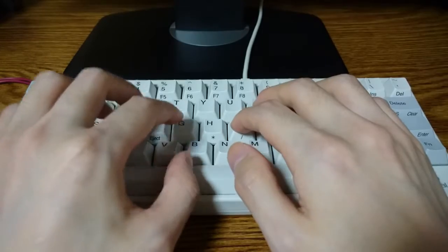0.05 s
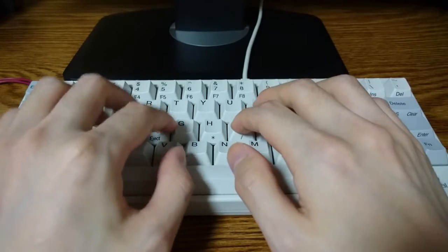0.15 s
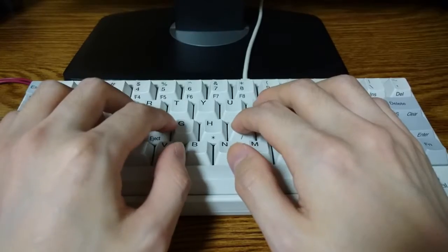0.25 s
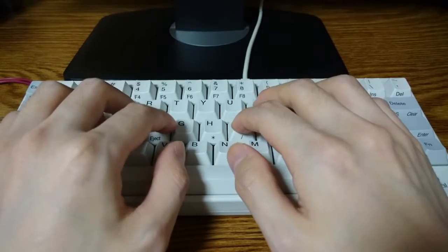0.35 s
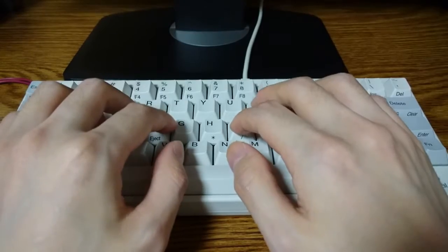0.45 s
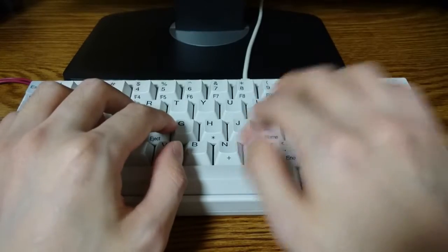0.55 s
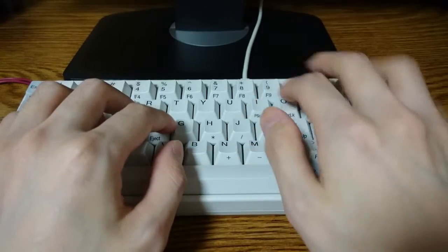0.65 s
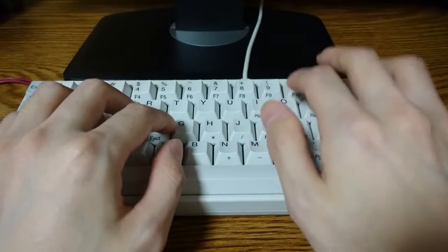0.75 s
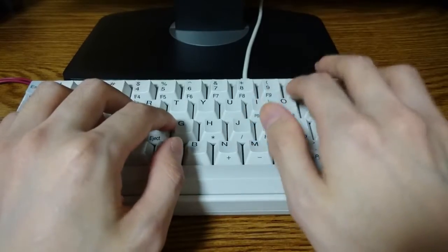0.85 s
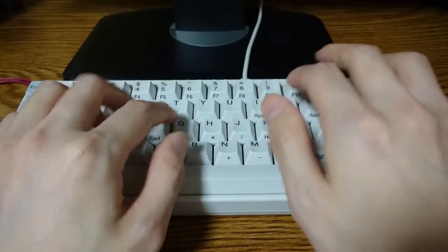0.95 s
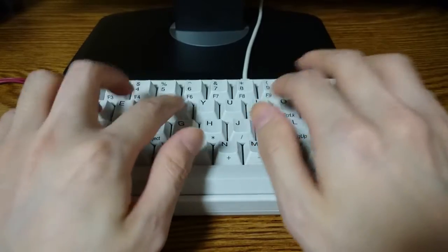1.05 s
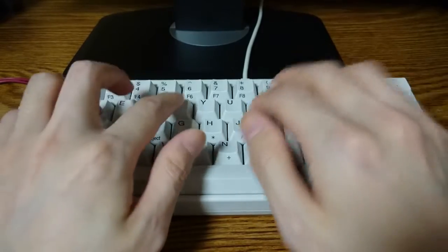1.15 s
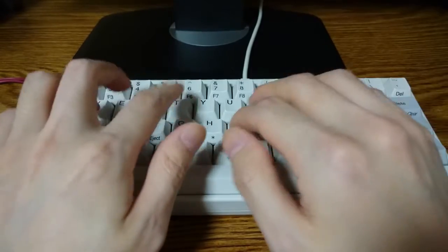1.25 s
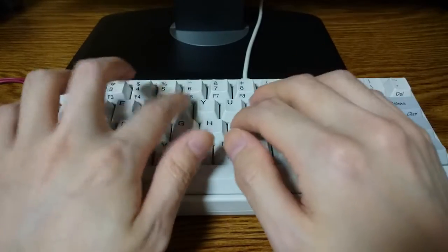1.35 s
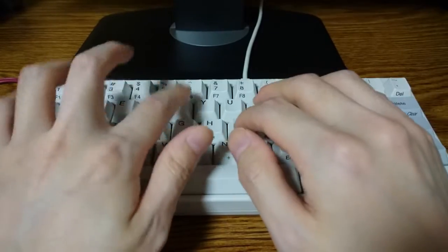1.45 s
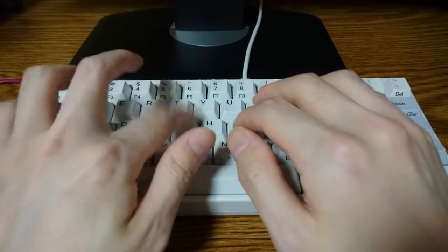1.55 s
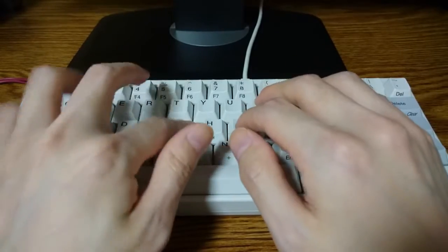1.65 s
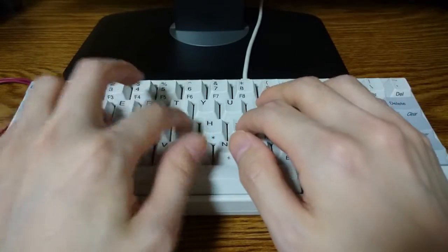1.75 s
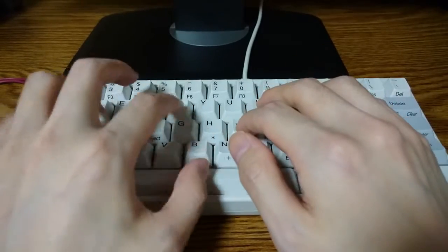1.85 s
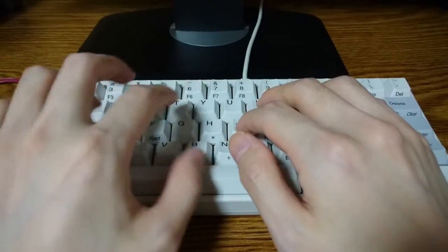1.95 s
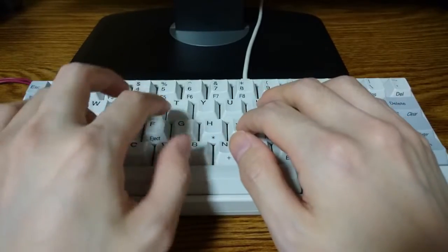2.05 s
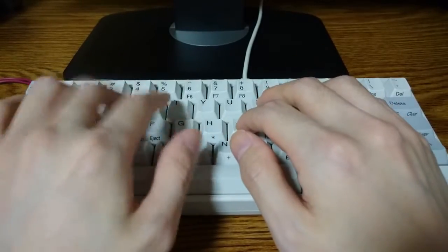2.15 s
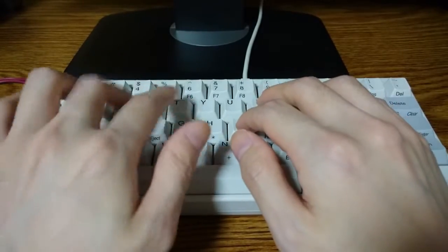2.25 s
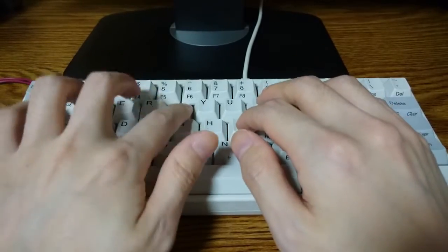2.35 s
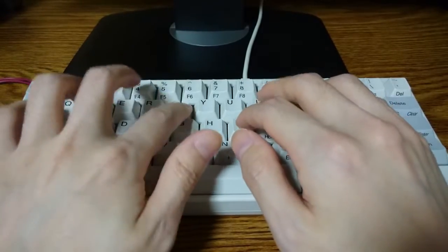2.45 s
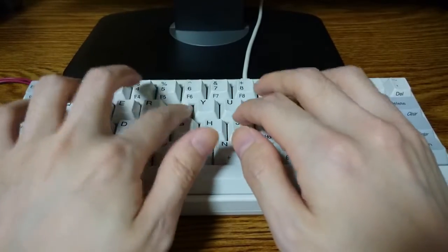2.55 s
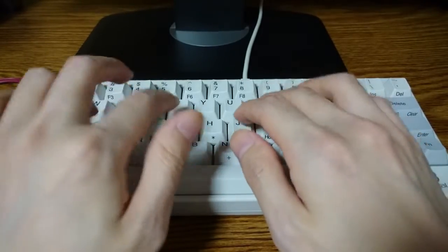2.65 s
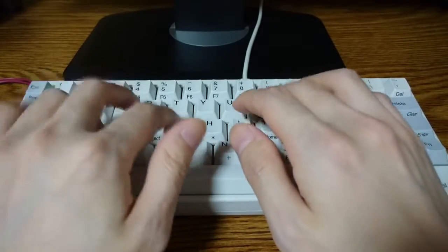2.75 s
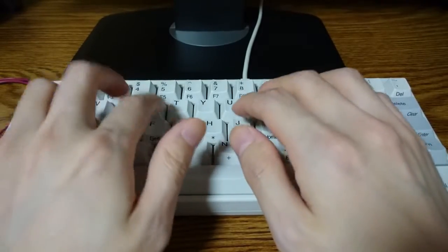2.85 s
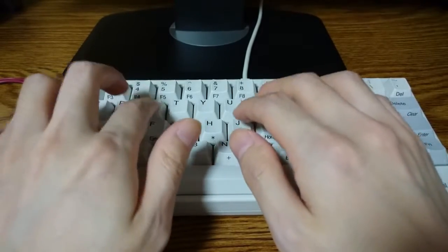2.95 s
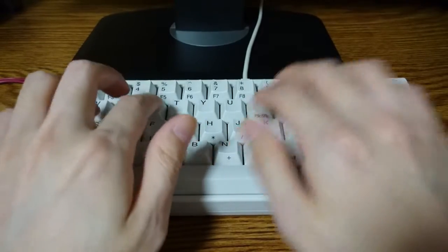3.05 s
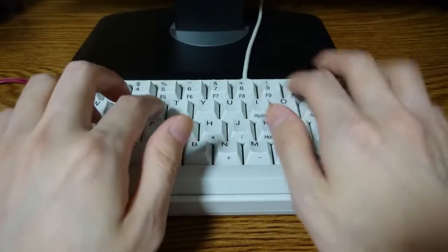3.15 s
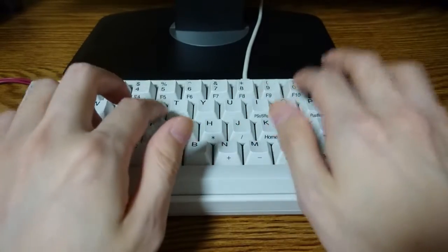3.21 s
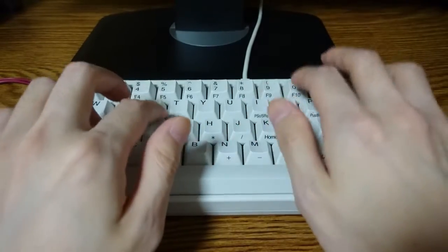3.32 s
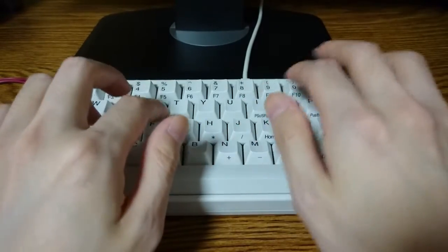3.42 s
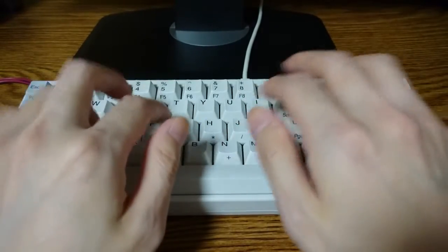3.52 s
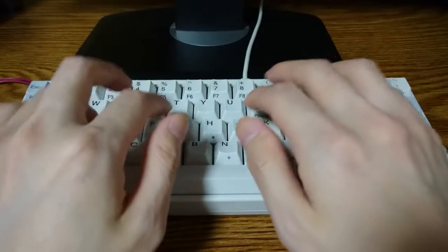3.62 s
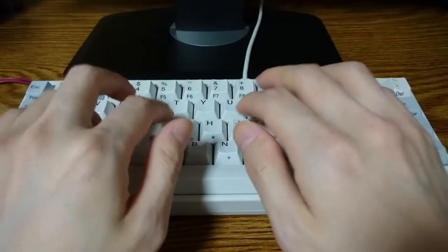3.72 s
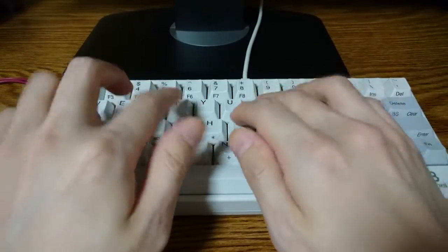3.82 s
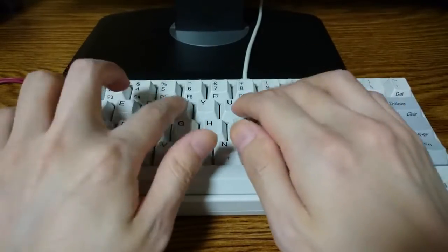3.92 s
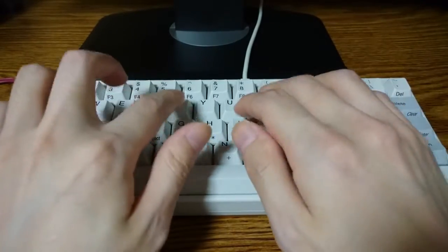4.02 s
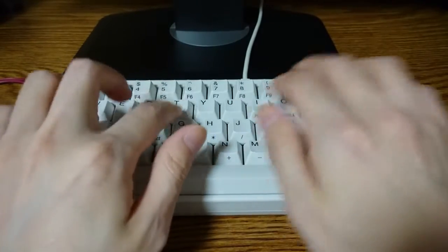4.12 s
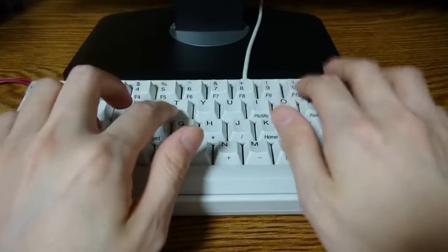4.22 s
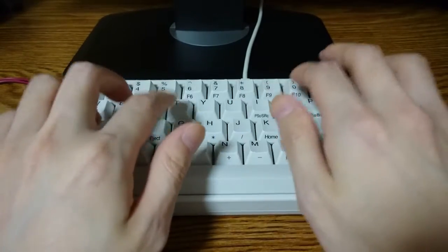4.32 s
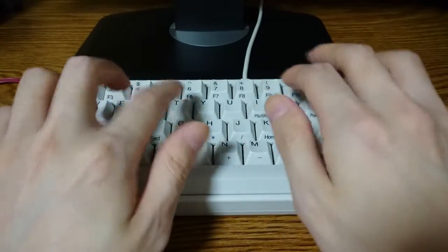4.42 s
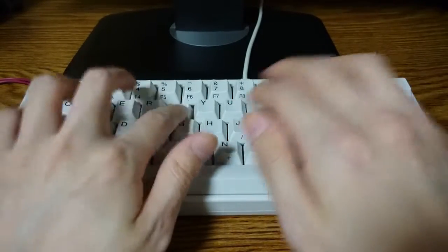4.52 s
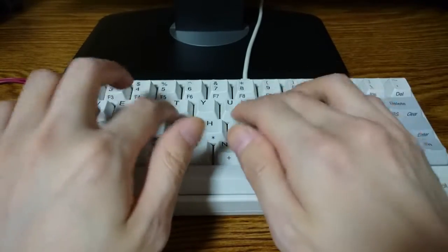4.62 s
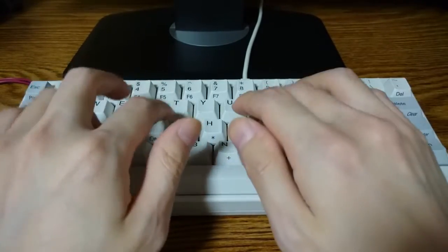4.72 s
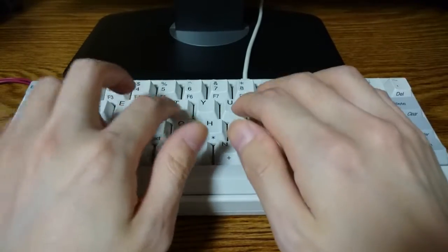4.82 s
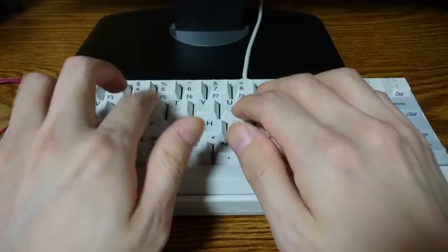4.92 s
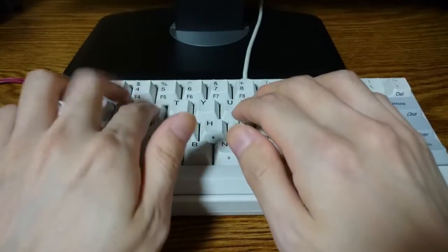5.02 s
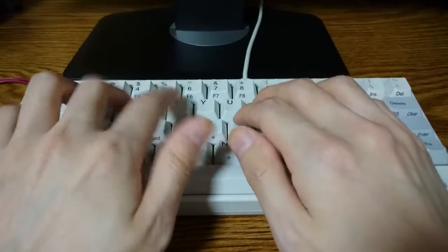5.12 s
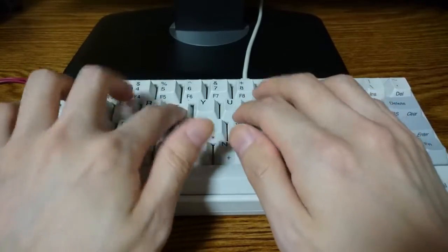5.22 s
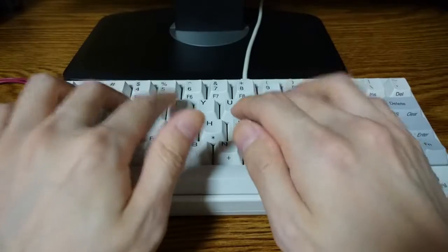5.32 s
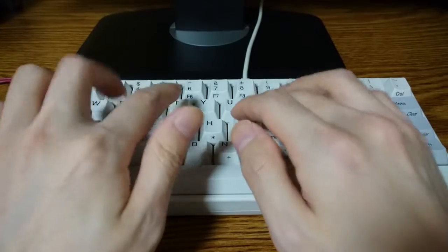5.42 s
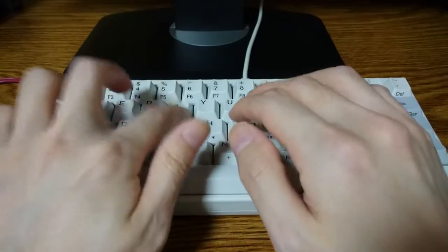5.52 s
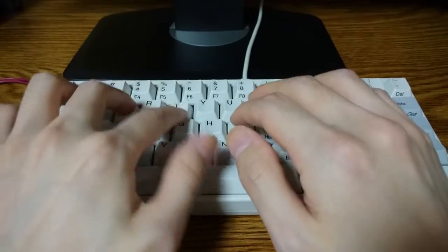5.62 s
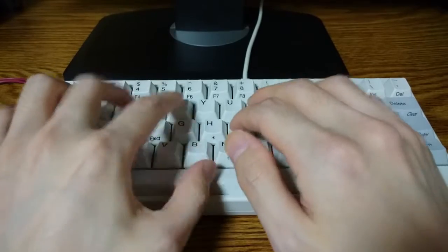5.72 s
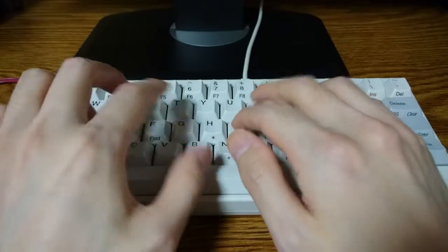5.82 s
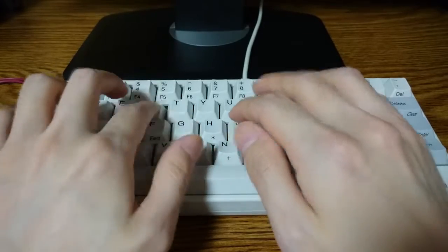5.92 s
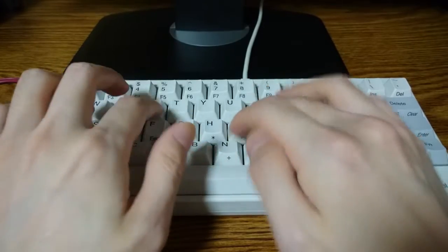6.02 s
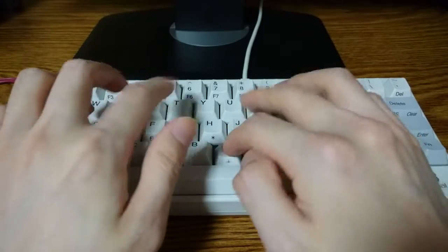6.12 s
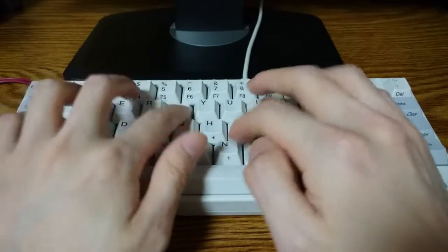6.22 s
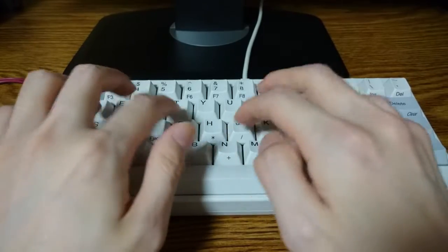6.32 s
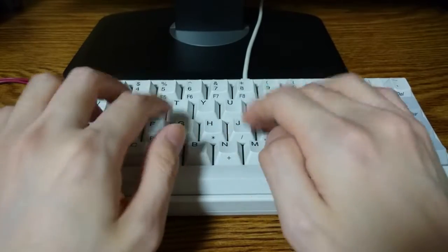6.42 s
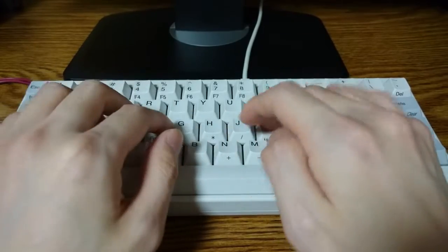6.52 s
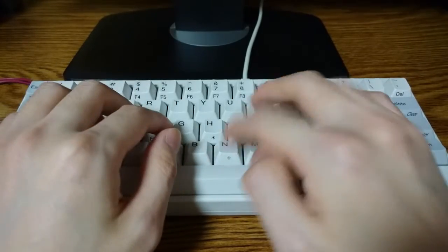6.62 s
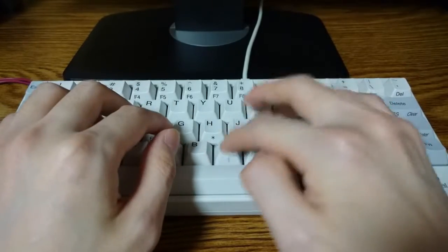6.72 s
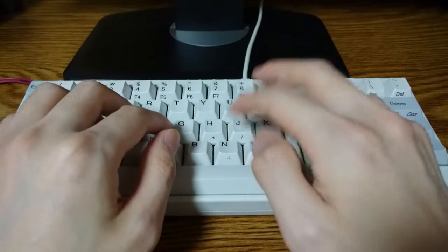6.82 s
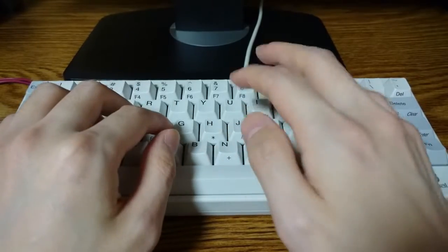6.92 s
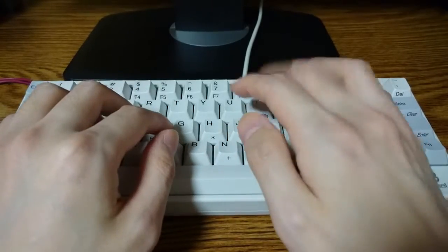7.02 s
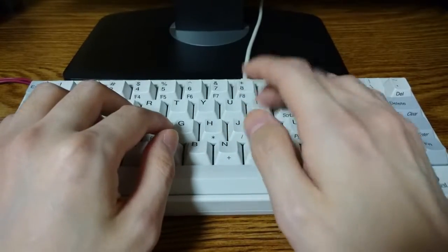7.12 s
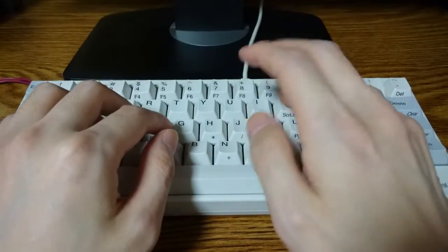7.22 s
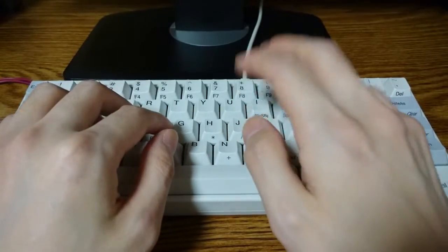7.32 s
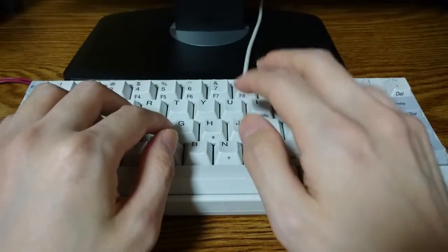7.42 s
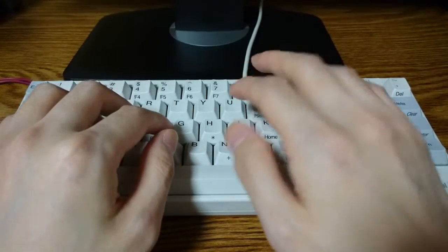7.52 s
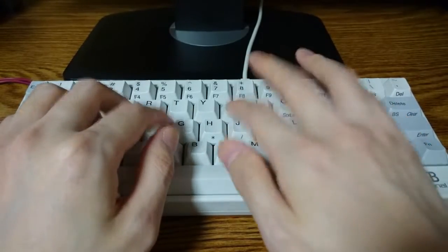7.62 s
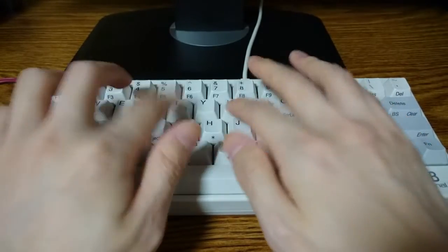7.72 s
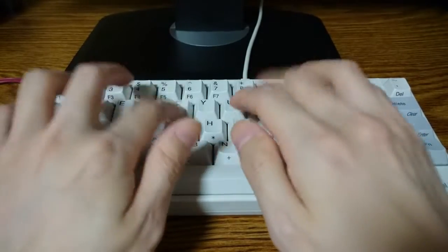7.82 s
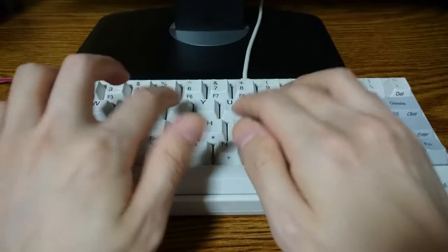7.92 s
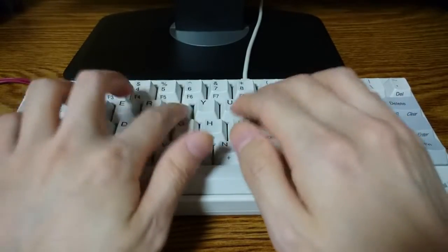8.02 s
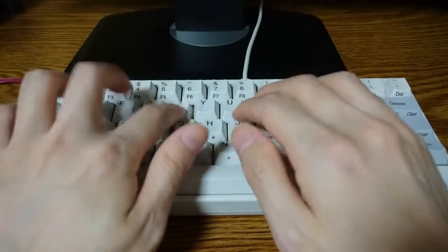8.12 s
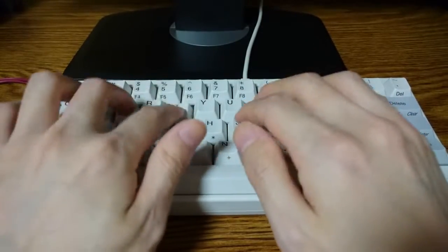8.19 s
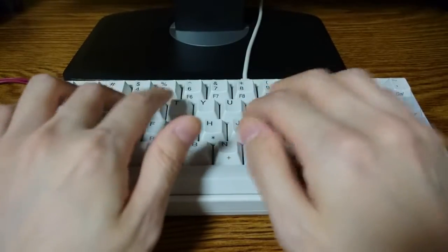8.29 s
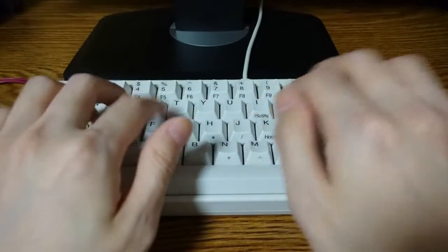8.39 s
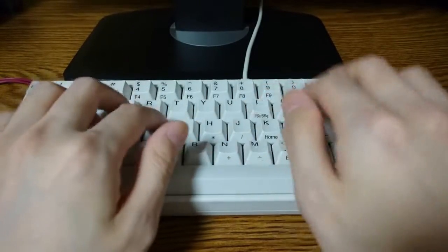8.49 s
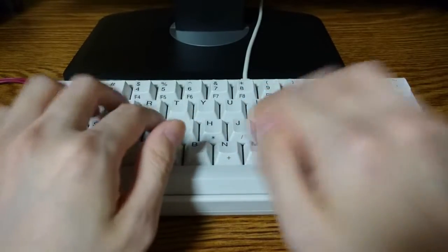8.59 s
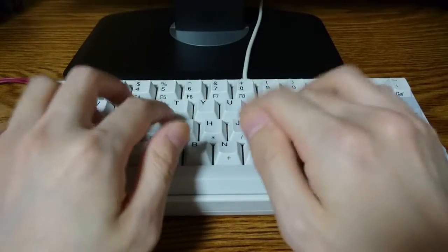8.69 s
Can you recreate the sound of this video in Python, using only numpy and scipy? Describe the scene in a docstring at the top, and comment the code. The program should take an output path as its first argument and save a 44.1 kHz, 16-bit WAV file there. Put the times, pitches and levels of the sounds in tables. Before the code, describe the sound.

A mechanical keyboard on a wooden desk is typed on quickly, heard very close in a quiet room. An opening slap of keys is followed by a short gap, two separate deeper presses, another gap, then nearly continuous typing. Dry plastic clacks mix with soft finger touches and woody thuds, each with a tiny rattle. The stereo image is narrow, with faint steady hiss and little room tail.

```python
"""A faint hiss, then a light touch and a slap open fast typing: dry clacks, soft touches and deeper thuds.
The plastic keyboard stands on a wooden desk in a quiet room, close to a narrow microphone pair.
Each touch, clack or landing is a short chatter of contacts that rings base, plate, cap, stem and wire;
a faint noise swells just before each knock and a rattle follows it. Sparse random taps give the room's
short tail, and coloured noise plus the capsules' own hiss lies underneath."""
import sys
import numpy as np
from scipy import signal
from scipy.fft import rfft, irfft, next_fast_len
from scipy.io import wavfile

SR = 44100
rng = np.random.default_rng(int(sys.argv[2]) if len(sys.argv) > 2 else 0)


def wav_out(sig):
    """Save sig, one row per channel (or a flat mono array), as 16-bit PCM at SR to the path in sys.argv[1]."""
    wavfile.write(sys.argv[1], SR, np.round(np.clip(np.atleast_2d(sig).T, -1, 1) * 32767).astype(np.int16))


N = 385857

# noise colour of the room, only its shape counts: [f/Hz, relative level per Hz/dB]
AIR_COLOUR = [(25, 11), (55, 2), (250, -12), (1000, -16.5), (2100, -18.5), (3500, -24.5), (6000, -35),
              (9000, -66.5)]
# room noise, its side part against it, own hiss of each capsule [level/dB]
AIR_DB, AIR_SIDE_DB, CAPSULE_DB = -61, -13.5, -77

# light touches and bounces that shake little more than cap and stem: [t/s, cap level/dB, stem level/dB]
TOUCHES = [(0.019, -55, -62), (0.0553, -43, -70), (0.0895, -66, -73), (0.095, -47, -65), (0.1095, -48, -51),
           (0.265, -59.5, -69), (0.285, -66, -69), (0.75, -67, -48), (0.8945, -63, -58), (1.041, -57, -73),
           (1.98, -45, -70), (2.001, -49, -59), (2.0278, -50, -61), (2.5638, -60.5, -76),
           (2.6786, -54, -89), (2.7215, -49, -49.5), (2.867, -53, -62), (3.065, -47, -60),
           (3.093, -50.5, -77), (3.724, -59, -69.5), (4.413, -61, -59.5), (4.6225, -45.5, -65),
           (4.738, -61, -63), (4.7812, -46, -64), (5.023, -56.5, -64), (5.1353, -53, -52),
           (5.1502, -54, -49), (5.1623, -65, -50.5), (5.174, -52.5, -55), (5.267, -39.5, -60),
           (5.342, -46.5, -45), (5.4272, -39.5, -56), (5.6158, -44.5, -49), (6.0908, -46, -59),
           (6.1222, -47, -58), (6.157, -82, -47.5), (6.237, -55, -71), (6.3352, -42.5, -58),
           (6.375, -39, -63), (6.4829, -47.5, -55), (6.5003, -50, -51), (6.5177, -47.5, -45.5),
           (6.588, -60, -57), (6.61, -53, -60), (6.78, -52, -47.5), (6.823, -47, -59), (6.936, -71, -65),
           (6.9457, -54, -55), (7.1446, -49.5, -59), (7.2105, -51, -62), (7.4167, -54.5, -71),
           (7.515, -54, -68), (7.5243, -50.5, -56), (7.7125, -49, -70), (7.91, -56, -63), (8.082, -42, -51),
           (8.134, -48, -59), (8.169, -42.5, -73), (8.332, -52, -55)]
# the rest of a touch: [base, plate, wire level against the louder of cap and stem/dB,
# best-ringing cap pitch f/Hz, chatter t/ms]
TOUCH_REST = (-13, -14, -40, 2999.5, 4)
# a key is slapped or snaps back up: [t/s, cap level/dB, stem level against the cap/dB,
# base level against the cap/dB, best-ringing cap pitch f/Hz, chatter t/ms]
CLACKS = [(0.0376, -47.5, -5, -5, 3200, 2), (0.0628, -29, -5, -4, 3070, 3.8),
          (0.153, -44, -19, -5, 2950, 4.1), (0.84, -50, 0, 2.5, 3600.0, 12),
          (0.9971, -49.5, -1.5, 2, 3630, 8.5), (1.6686, -46.0, -4, -18, 2620, 1.4),
          (1.7717, -36, -1.5, -11, 2640, 1.2), (1.8389, -32, -7, -20.0, 2720, 3.5),
          (1.9102, -35, -17, -10, 3000, 11), (1.9313, -29, -7, -6, 3030, 3.8),
          (1.963, -37.5, -6, -5, 2240.0, 2.0), (2.0415, -43.5, -9, -4, 2940, 4.5),
          (2.1033, -41, 3.5, -28, 3360.0, 2.8), (2.2315, -39, 3.5, -8.5, 3240, 1.9),
          (2.42, -38.5, -10, -22, 2870, 2.8), (2.4402, -36, -7.5, -12.0, 2970, 1.6),
          (2.742, -49.0, -8, -4, 3070, 3.2), (2.8163, -41.5, -0.5, -11, 3200, 2.3),
          (2.8826, -32.5, 2, -16, 3160, 0.66), (2.943, -36.5, -5.5, -8, 3200, 1.5),
          (3.074, -36.5, -8.5, -23.0, 2100.0, 2.4), (3.3376, -42.5, 3, -8, 3620, 2.1),
          (3.493, -45, -8, -9, 3600.0, 5.4), (3.6139, -47.5, 2, -8, 2500, 1.8),
          (3.8858, -38.0, -1, -2, 2410, 3.3), (3.989, -46, -11, -14.5, 2630, 4.1),
          (4.2761, -57, 11, 6, 3430.0, 2.3), (4.3064, -38, -10, -5.5, 2400, 14),
          (4.368, -44.5, -0.5, -3, 3570, 4.1), (4.5643, -33, -7.5, -12, 2480, 1.8),
          (4.6683, -33, -16, -37, 2960, 3.4), (4.6765, -33.5, -4, -5.5, 2350.0, 1.3),
          (4.7625, -42.0, 1, -17, 2850, 2), (4.8689, -45.5, 3.5, -5.5, 3440.0, 2.6),
          (4.9015, -36.5, -2, -19, 3120, 1), (5.05, -44, -1, -10, 2880, 1.0),
          (5.075, -36.5, -5.5, -7, 2580, 2.5), (5.2338, -34, 0.5, -12, 2880, 3.6),
          (5.2535, -38.5, -11, 0.5, 2500, 3.2), (5.3811, -28.5, -17.5, -26, 2980, 0.88),
          (5.4114, -48, -1, -11, 2880, 2.2), (5.4356, -42.5, 0, -4.5, 3300, 3.3),
          (5.505, -42.5, -9, -12, 2460, 1.1), (5.681, -51.5, 7.5, -3, 2830, 7.2),
          (5.748, -32.5, -17.5, -34, 2950, 2.4), (5.7821, -32.5, -7.5, -16.5, 2940, 5.1),
          (5.8663, -51.5, -7, -15.5, 3090.0, 1.3), (5.892, -32.5, -1, -6.5, 3000, 6),
          (5.9899, -42, 3.5, -5.5, 2920, 1.4), (6.0573, -45.5, -2, -9, 2860, 5),
          (6.143, -38, -13, -33.5, 2750, 1.9), (6.1986, -49.5, -1, -12, 2730, 1.9),
          (6.2845, -27, -13, -16, 2860, 6.1), (6.366, -36.0, -7.5, -42, 2360, 5.3),
          (6.651, -41.5, 1, -13, 2870, 5.7), (6.704, -40, -4.0, -25, 2760.0, 5.7),
          (6.7407, -43, -0.5, -15, 3150, 6.5), (6.8367, -36, -8.0, -17, 2680, 5.2),
          (7.4389, -48, -10, -8, 2620.0, 3.3), (7.719, -40.5, 2, -13, 3170, 4.2),
          (7.8181, -35, -2.5, -7, 2820, 3.7), (7.8395, -45.5, 7, 4, 2730.0, 1.2),
          (7.8481, -34.5, -14, -3.5, 2580, 4.6), (7.927, -30, -10, -22.5, 2900, 4.9),
          (8.0369, -39.5, -8, -20, 2800, 5.9), (8.0925, -36, -14, -9, 2790.0, 2.5),
          (8.157, -30, -8.5, -38, 3100, 2.6), (8.2535, -48, 2, -4, 2630, 5.2),
          (8.323, -30.5, -18, -32, 2900, 3.7), (8.4068, -37.5, -4.5, -8.5, 3000, 6.8),
          (8.5214, -41.0, 1.0, -4, 3430.0, 4.4), (8.7109, -39, 0, -5.5, 3200, 2.2)]
# plate under a clack: level/dB, and dB per dB of the base and of the louder of cap and stem
PLATE_DB, PLATE_FROM_BASE, PLATE_FROM_KEY = -13.5, 0.36, 0.45
# a key hits the bottom of its travel: [t/s, thud level/dB, plate level against the thud/dB,
# cap level/dB, stem level against the cap/dB, chatter t/ms]
LANDINGS = [(0.7745, -40.5, -10.5, -61, 12, 1.3), (0.9258, -43.5, -13, -63, 13.5, 1.3),
            (1.697, -44.5, 2.5, -43.5, -1, 4.2), (1.7864, -35, 0, -32.5, -5.5, 1.7),
            (2.1295, -36, -11, -46.0, -0.5, 1.5), (2.2504, -50, 7, -51, -5, 3.8),
            (2.2638, -35.5, -2.5, -38.5, -1.0, 2.8), (2.3486, -55.5, 13, -42.5, 0, 6.9),
            (2.8365, -34, -6, -41.0, -4.5, 2.6), (2.9017, -41, 6, -38.5, -8, 3.6),
            (3.245, -51.5, 2.5, -52.5, 1, 2.6), (3.262, -31.5, -5.5, -48, 5, 5.9),
            (3.3807, -55.5, 5.0, -54.5, 4.0, 5.2), (3.4026, -32, -3, -44, 1, 4),
            (3.6383, -37.5, -4.0, -51.5, 4.5, 3.1), (3.7898, -35.5, -14, -60.5, -10, 0.74),
            (3.8978, -46, 8, -39.5, -10, 0.93), (4.2891, -33, -9.5, -47.5, 7.5, 1.8),
            (4.573, -39.5, 0, -35.5, -10, 2.2), (4.798, -42.5, -4, -53.5, -6, 3.3),
            (4.934, -42.0, -5, -44.0, -6, 1.6), (5.3612, -40, -3, -45.5, -2, 1.3),
            (5.706, -41, 5, -48, -1.5, 1.2), (5.797, -33.5, 2, -32.5, -6.5, 1.4),
            (5.819, -46.0, 5.5, -39.5, 1.5, 5), (6.004, -33.5, -19, -44.5, -6, 1.4),
            (6.0716, -46, 2.5, -43.5, -6.5, 1.4), (6.62, -47.5, 1.0, -48.5, -4.0, 5),
            (6.7656, -41.5, -3.5, -50, -4, 2.7), (7.7327, -42.5, 9, -36.5, -13, 3.1),
            (8.224, -45.5, -6, -53, -6, 7.9), (8.2774, -42.5, 3.5, -44, 0.0, 1.6),
            (8.54, -37.5, -8.5, -43.5, -5, 2.3), (8.6139, -44, -16, -48.5, 3.5, 4.6)]
LANDING_HZ = 2734  # best-ringing pitch of a cap that is held down
# spans in which the knocks sound brighter and wirier: [from t/s, to t/s, wire level against the stem/dB]
WIRY_SPANS = [(.05, .2, -5), (.76, .79, -14), (1.75, 1.85, -22.5), (1.9, 1.95, -6.5), (2.2, 2.36, -21.5),
              (2.87, 2.95, -17), (4.27, 4.32, -15.5), (5.07, 5.08, -27), (5.23, 5.26, -22.5),
              (5.77, 5.9, -8.5), (6.27, 6.3, -20), (8.15, 8.16, -20), (8.51, 8.72, -13.5)]
WIRE_DB = -36.5  # least wire level against the stem

# modes of the five parts, levels relative within a part: [f/Hz, level/dB, t60/s]
BASE = [(116, 0, 0.078), (188.3, -7.5, .06), (283.3, -2.5, 0.049), (352, -12, 0.1), (445, -4.5, 0.058)]
PLATE = [(550, -5.5, 0.03), (791, 7.5, 0.027), (991, 9, 0.022), (1150, 3, 0.051), (1290, -27.5, 0.0082)]
CAP = [(2120, -12, .014), (2140, 6, 0.047), (2470, 3.5, 0.024), (2938, 8.5, 0.019), (3427, -1, 0.046),
       (3470, -18, 0.0058)]
STEM = [(4430, 5, 0.024), (5030, 24, 0.015), (5510, 19.5, 0.012), (6060, 17.5, 0.021), (7180, -75.5, 0.002),
        (8950, -48.5, 0.0071)]
WIRE = [(8300, -5, 0.004), (9470, 4, 0.00064), (14000, 5.5, 0.0022)]
# band in which each part radiates, base to wire: [low f/Hz, high f/Hz]
RADIATION = [(50, 700), (450, 2000), (1400, 4800), (3500, 7900), (7600, 15000)]
# random detuning of the partials, one per part, base to wire: [standard deviation as a share of f]
DETUNING = [.015, .05, .05, .05, .02]
WEIGHT_SPREAD_DB = 3.0  # random weight of each partial
CAP_FOCUS_DB = 39.5  # a cap mode loses this much per octave away from the best-ringing pitch
WIRE_FULL_DB, WIRE_WAKE = -48, 0.17  # top wire mode: dB lost per dB of wire level under the first

# modes that the wide key at the right edge adds: [f/Hz, level/dB, t60/s]
WIDE_CAP = [(3640, 1.3, 0.037)]
WIDE_STEM = [(4630, 15.5, 0.072)]
# spans in which the wide key is used: [from t/s, to t/s]
WIDE_SPANS = [(.7, 1.1), (3.2, 3.55), (4.25, 4.45)]
WIDE_BASS_DB = -16  # the wide key stirs the lowest base mode less

LEAD = 2400  # samples of faint noise ahead of each knock
ATTACK_S = 0.00034  # rise of a chatter, time constant
SWELL_S = 0.018  # growth of the faint noise just before each knock, time constant
SWELL_DB, SWELL_LAG = -39, 0.52  # its share for a 0 dB knock; dB of share lost per dB of knock
RATTLE_DB, RATTLE_PER_S, RATTLE_T60 = -28, 2500, 0.13  # loose cap: tick scale dB, ticks per s, fade s
RATTLE_HZ = 2930  # pitch at which any loose cap rings best
DAMPING = 3.2  # modes die this many times faster in the swell and the rattle, under the finger

# decay of the room tail: [f/Hz, t60/s]
ROOM_DECAY = [(100, 0.32), (500, 0.49), (2000, 0.36), (6000, 0.088), (14000, 0.31)]
ROOM_DB = -16  # room tail against the direct keys
# side share of the keys: [f/Hz, level/dB]
SIDE_LEVEL = [(60, -22), (2500, -42), (5000, -19.5), (10000, -12.5)]
EDGE_HZ = 16000  # upper band limit


def gain_of(db):
    """Gain of a level in dB."""
    return 10 ** (np.asarray(db) / 20)


def read(points, hz):
    """Value of a (Hz, value) table, straight on a log-frequency axis."""
    f, value = np.transpose(points)
    return np.interp(np.log(hz + 1), np.log(f + 1), value)


def add(mix, s, sound):
    """Mixes a sound in at time s."""
    part = mix[max(round(s * SR), 0):][:len(sound)]
    part += sound[:len(part)]


def hiss():
    """Steady coloured room noise, almost alike in both capsules, and each capsule's own white hiss."""
    size = next_fast_len(N)
    colour = gain_of(read(AIR_COLOUR, np.fft.rfftfreq(size, 1 / SR)))
    mid, apart = irfft(rfft(rng.standard_normal((2, size))) * colour, size)[:, :N]
    apart = gain_of(AIR_SIDE_DB) * apart
    air = gain_of(AIR_DB) / mid.std() * np.array([mid + apart, mid - apart])
    return air + gain_of(CAPSULE_DB) * rng.standard_normal((2, N))


def touch(s, cap_db, stem_db):
    """A light touch written as a full knock: base, plate and wire follow the louder of cap and stem."""
    base_db, plate_db, wire_db, cap_hz, chatter_ms = TOUCH_REST
    top_db = max(cap_db, stem_db)
    return s, top_db + base_db, top_db + plate_db, cap_db, stem_db, top_db + wire_db, cap_hz, chatter_ms


def wire_level(s, stem_db):
    """Level of the wire: a fixed step under the stem, higher in the wiry spans."""
    return stem_db + max([WIRE_DB] + [db for start, end, db in WIRY_SPANS if start < s < end])


def clack(s, cap_db, stem_db, base_db, cap_hz, chatter_ms):
    """A clack written as a full knock: the plate rises with both base and key."""
    stem_db, base_db = cap_db + stem_db, cap_db + base_db
    plate_db = PLATE_DB + PLATE_FROM_BASE * base_db + PLATE_FROM_KEY * max(cap_db, stem_db)
    return s, base_db, plate_db, cap_db, stem_db, wire_level(s, stem_db), cap_hz, chatter_ms


def landing(s, thud_db, plate_db, cap_db, stem_db, chatter_ms):
    """A landing written as a full knock: the thud is the level of the base."""
    stem_db = cap_db + stem_db
    wire_db = wire_level(s, stem_db)
    return s, thud_db, thud_db + plate_db, cap_db, stem_db, wire_db, LANDING_HZ, chatter_ms


def contacts(chatter_ms, swell_db, ticks, draw):
    """Drives of the key: a spiky chatter; a faint noise swelling before it and uneven ticks after it."""
    t = (np.arange(len(ticks)) - LEAD) / SR
    after = np.maximum(t, 0)
    length = max(chatter_ms, .3) / 1000
    spikes = ticks * abs(ticks)  # squaring with the sign kept makes the ticks uneven
    chatter = spikes * np.exp(-after / (1.12 * length)) * (1 - np.exp(-after / ATTACK_S))
    swell = ticks * (t < 0) * np.exp(np.minimum(t, 0) / SWELL_S)
    struck = (draw < RATTLE_PER_S / SR) * (t > 0)
    rattle = spikes * struck * gain_of(RATTLE_DB - 60 * after / RATTLE_T60)
    loose = gain_of(swell_db) * swell / np.linalg.norm(swell) + rattle
    return chatter / np.linalg.norm(chatter), loose


def ring(modes, detuning, chance, t, loose_db):
    """Impulse responses of one part, three close partials a mode: ringing free, and damped by the finger."""
    hz, db, t60 = np.transpose(modes)[:, :, None]
    weight, shift = chance[:, :, :len(modes), None]
    partials = np.sin(2 * np.pi * hz * (1 + detuning * shift) * t)
    waves = (gain_of(db + WEIGHT_SPREAD_DB * weight) * partials).sum(0)
    free = (waves * gain_of(-60 * t / t60)).sum(0)
    damped = (waves * gain_of(loose_db - 60 * t * DAMPING / t60)).sum(0)
    return free / np.linalg.norm(free), damped / np.linalg.norm(damped)


def modes_of_key(s, wire_db, cap_hz):
    """Modes of the five parts for one knock: cap focused on its pitch, wide key and wire accounted for."""
    wide = any(start < s < end for start, end in WIDE_SPANS)
    base = [(hz, db + wide * WIDE_BASS_DB, t60) for hz, db, t60 in BASE[:1]] + BASE[1:]
    cap = [(hz, db - CAP_FOCUS_DB * abs(np.log2(hz / cap_hz)), t60) for hz, db, t60 in CAP]
    cap, stem = cap + wide * WIDE_CAP, STEM + wide * WIDE_STEM
    asleep_db = WIRE_WAKE * max(WIRE_FULL_DB - wire_db, 0)  # the top wire mode needs a hard blow
    wire = WIRE[:-1] + [(hz, db - asleep_db, t60) for hz, db, t60 in WIRE[-1:]]
    return [base, PLATE, cap, stem, wire]


def knock(row, chance, ticks, draw, filters):
    """The contact drives ring the five parts; levels are energy of the first 14 ms, counted per 10 ms."""
    s, *levels_db, cap_hz, chatter_ms = row
    swell_db = SWELL_DB - SWELL_LAG * max(levels_db)  # the swell grows less than the knock
    chatter, loose = contacts(chatter_ms, swell_db, ticks, draw)
    thud = 0.99 * chatter  # the heavy base also feels one single landing
    thud[LEAD] += 1
    parts = modes_of_key(s, levels_db[-1], cap_hz)
    chance = chance * np.append(np.ones(6), .1)  # the seventh mode is the wide key's: it hardly varies
    cap_modes_hz = np.transpose(parts[2])[0, :, None]
    from_key, from_rattle = abs(np.log2(cap_modes_hz / cap_hz)), abs(np.log2(cap_modes_hz / RATTLE_HZ))
    refocus_db = CAP_FOCUS_DB * (from_key - from_rattle)  # moves the loose cap to its own pitch
    out, size = np.zeros(len(ticks)), 8192
    chatter, thud, loose = rfft([chatter, thud, loose], size)
    for k, modes in enumerate(parts):
        t = np.arange(SR // (10 + 5 * k)) / SR  # shorter responses for higher parts
        responses = ring(modes, DETUNING[k], chance[k], t, refocus_db if k == 2 else 0)
        free, damped = rfft(responses, size)
        blow = thud if k == 0 else chatter
        sound = irfft(blow * free + loose * damped, size)[:len(out)]
        sound = signal.sosfilt(filters[k], sound)
        energy = np.sum(sound[LEAD:LEAD + SR // 70] ** 2) / (SR // 100)
        out += sound * gain_of(levels_db[k]) / np.sqrt(energy)
    return s, out


def keys():
    """All landings, clacks and touches, each with its own random contacts and partials."""
    size, mix = LEAD + SR // 9, np.zeros(N + LEAD)
    filters = [signal.butter(4, band, "bandpass", fs=SR, output="sos") for band in RADIATION]
    rows = [landing(*row) for row in LANDINGS]
    rows += [clack(*row) for row in CLACKS]
    rows += [touch(*row) for row in TOUCHES]
    for row in rows:
        chance = np.clip(rng.standard_normal((5, 2, 3, 7)), -2, 2)  # part, weight or shift, partial, mode
        add(mix, *knock(row, chance, rng.standard_normal(size), rng.random(size), filters))
    return mix[LEAD:]  # puts the knock itself, not its swell, at the listed time


def room(x):
    """Sparse taps of random sign, each band dying at its own speed."""
    taps = np.zeros(SR // 2)
    at = np.arange(120, SR // 2 - 20, 20)
    taps[at + rng.integers(0, 20, len(at))] = rng.choice([-1., 1.], len(at))
    hz, t, z = signal.stft(taps, SR, nperseg=256)
    fade = gain_of(-60 * t / read(ROOM_DECAY, hz)[:, None])
    tail = signal.istft(z * fade, SR, nperseg=256)[1]
    return signal.fftconvolve(x, tail / np.linalg.norm(tail))[:N]


def side(mid):
    """A faint left-right spread: the same sound with each short-time bin turned at random."""
    hz, t, z = signal.stft(mid, SR, nperseg=256)
    turn = np.exp(2j * np.pi * rng.random(z.shape))
    share = gain_of(read(SIDE_LEVEL, hz))[:, None]
    return signal.istft(z * turn * share, SR, nperseg=256)[1][:N]


def scene():
    """Keys, their room tail and the hiss, nearly the same in both capsules."""
    typing = keys()
    typing = typing + gain_of(ROOM_DB) * room(typing)
    spread = side(typing)
    return np.array([typing + spread, typing - spread]) + hiss()


def record(dry):
    """The microphone's gentle bass cut at 30 Hz and the upper band limit."""
    lean = signal.sosfilt(signal.butter(1, 30, "highpass", fs=SR, output="sos"), dry)
    band_limit = signal.firwin(511, EDGE_HZ, window=("kaiser", 9), fs=SR)
    return signal.oaconvolve(lean, band_limit[None], "same")


dry = scene()
out = record(dry)
wav_out(out)
```